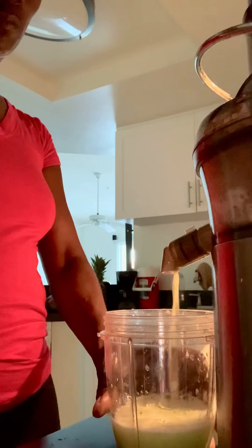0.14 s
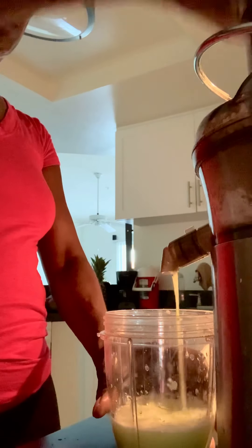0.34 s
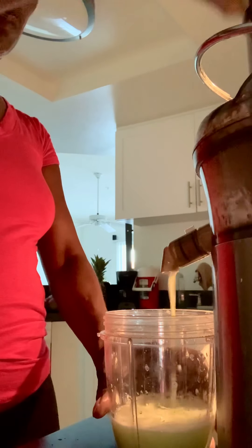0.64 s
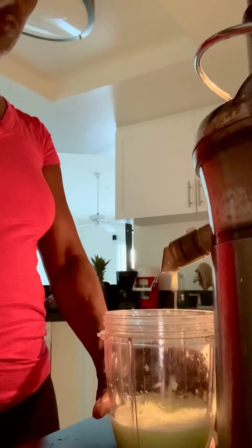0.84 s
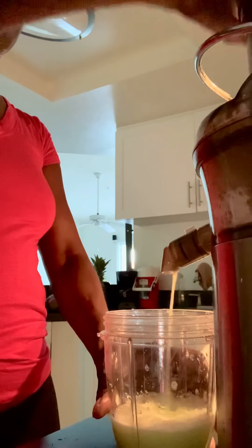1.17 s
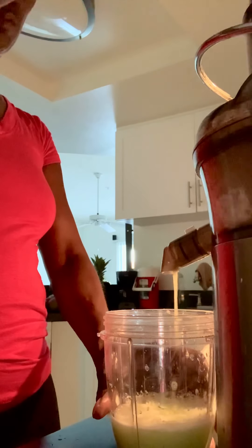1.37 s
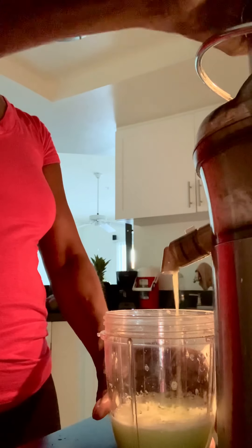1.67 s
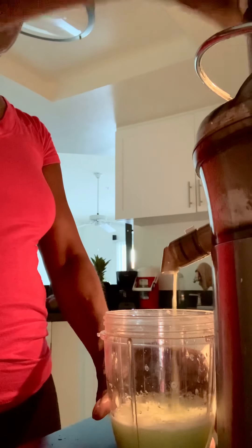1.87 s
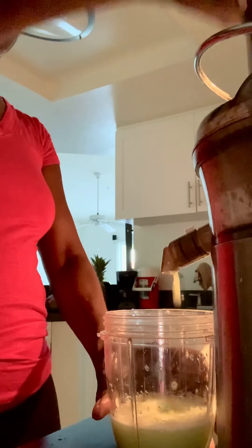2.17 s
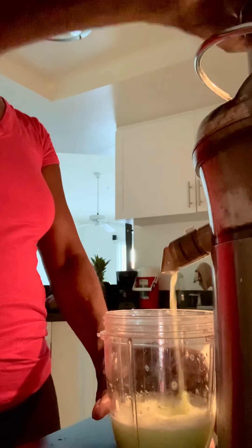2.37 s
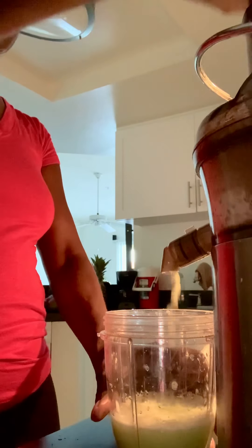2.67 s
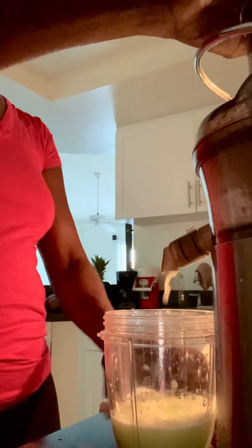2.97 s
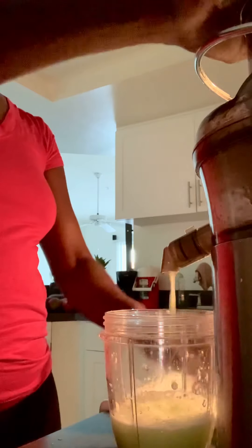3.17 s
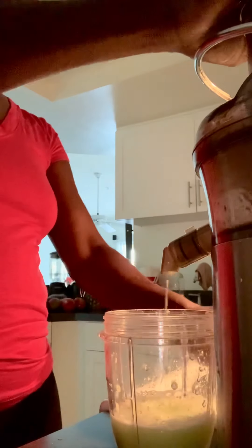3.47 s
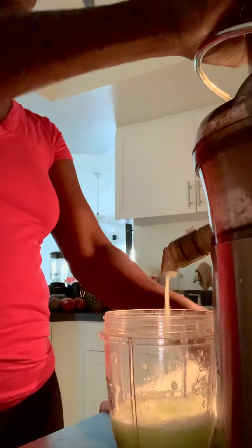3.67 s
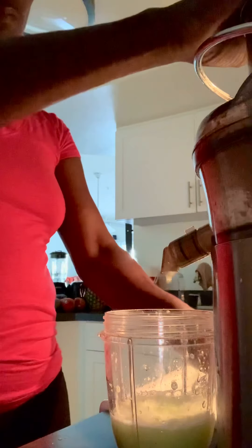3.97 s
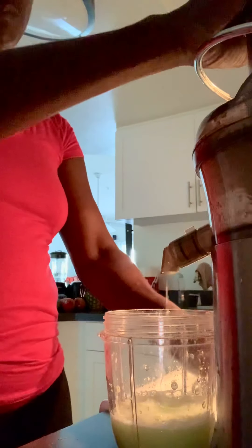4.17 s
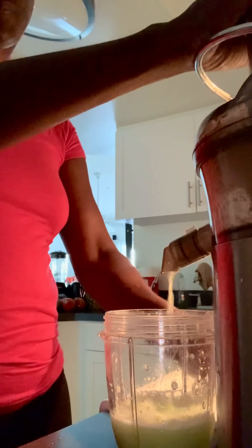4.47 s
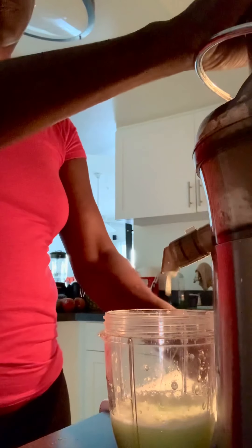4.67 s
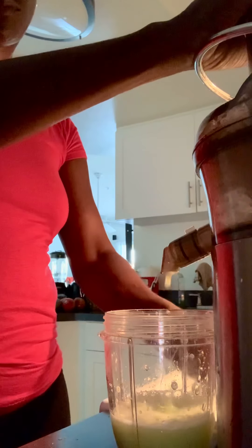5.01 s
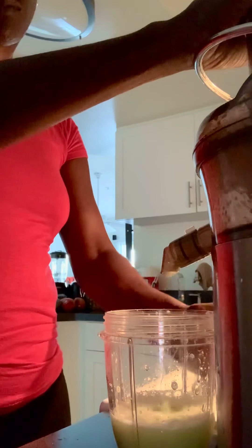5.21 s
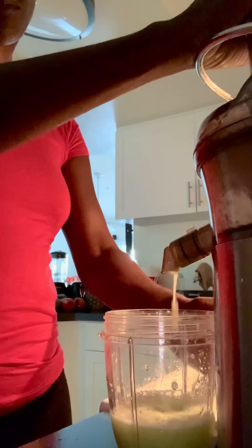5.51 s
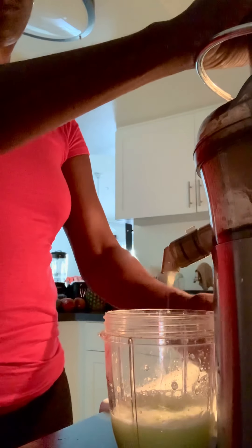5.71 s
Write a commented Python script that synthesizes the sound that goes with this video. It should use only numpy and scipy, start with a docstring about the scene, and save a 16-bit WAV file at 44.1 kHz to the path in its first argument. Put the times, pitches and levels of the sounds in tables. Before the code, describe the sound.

An electric juicer whirs steadily in a kitchen while its plastic pusher is rapped five times, then the motor starts winding down.

```python
"""On a kitchen counter, a centrifugal juicer runs at full speed close to two microphone ports.
Its unbalanced shaft drones, the commutator whines, the fan sings and magnetic pull hums, while air from
the spinning sieve rushes through the ringing housing. A hand raps the plastic food pusher five times
and a scrap of pulp sprays off the sieve. Near the end the motor is switched off and starts to coast."""
import sys
import numpy as np
from scipy import signal
from scipy.fft import rfft, irfft, next_fast_len
from scipy.io import wavfile
from scipy.ndimage import uniform_filter1d

SR = 44100
rng = np.random.default_rng(int(sys.argv[2]) if len(sys.argv) > 2 else 0)


def generate_wav(sig):
    """Save sig (samples, or channels by samples) to the path in sys.argv[1] as 16-bit PCM at SR."""
    pcm = np.round(np.clip(np.atleast_2d(sig).T, -1, 1) * 32767).astype(np.int16)
    wavfile.write(sys.argv[1], SR, pcm)


N = 257984
SWITCH_OFF_S = 5.36

# Shaft speed under power, creeping up as the pulp clears. Each row: time in seconds, speed in Hz.
SHAFT_SPEED = [(0, 186.2), (.3, 186.3), (.55, 186.75), (1.1, 186.85), (1.45, 186.7), (1.9, 187.2),
               (2.4, 187.5), (3.3, 188.25), (4.3, 188.55), (5.34, 188.95)]

def motor(spin_down_s=3.45):
    """The motor's tones ride on one shaft; at switch-off they slide down and the hum dies."""
    t = np.arange(N) / SR
    coasting_s = np.maximum(t - SHAFT_SPEED[-1][0], 0)
    speed = curve(SHAFT_SPEED, t) * np.exp(-coasting_s / spin_down_s)
    turn = 2 * np.pi * np.cumsum(speed) / SR
    current = np.exp(-np.maximum(t - SWITCH_OFF_S, 0) / .036)
    dip = press_dip(t)
    tones = dip * shaft_drone(turn, speed) + commutator_whine(t, turn) + cooling_fan(turn, speed)
    return np.sqrt(2) * (tones + current * dip * mains_hum(t, turn))


# Overtones of the drone. Each row: shaft multiple, level in dB against the fundamental.
SHAFT_ORDERS = [(3, -27.5), (4, -21), (6, -16), (7, -18), (10, -12.5), (12, -20), (14, -22)]

def shaft_drone(turn, speed, level_db=-28.5, sag_db_per_hz=.35):
    """Unbalance drones at the shaft rate and its multiples, weakening as the shaft slows."""
    drone = np.sin(turn) * gain_of(.7 * drift(N, size=1500))
    for order, db in SHAFT_ORDERS:
        wobble = .0052 * order * drift(N, size=600)  # the speed trembles, so high orders blur more
        level = gain_of(db + 2.36 * drift(N, size=2000))
        drone += level * np.sin(order * turn + wobble + 2 * np.pi * rng.random())
    return gain_of(level_db - sag_db_per_hz * np.maximum(SHAFT_SPEED[0][1] - speed, 0)) * drone


# The whine's swells and fades. Each row: time in seconds, level in dB.
WHINE_LEVEL = [(0, -48), (.55, -45), (1.3, -46), (1.65, -43), (2.0, -49), (2.2, -49), (2.42, -41),
               (3.3, -40), (3.85, -41), (4.3, -37), (5.34, -37.5), (5.38, -42), (5.44, -39), (5.47, -44),
               (5.6, -49), (5.67, -54), (5.71, -43), (5.77, -41), (5.8, -46), (5.85, -42)]

def commutator_whine(t, turn, bars=36):
    """A thin, high tone at the rate the commutator bars pass."""
    level = gain_of(curve(WHINE_LEVEL, t) + 1.4 * drift(N, size=600))
    return level * np.sin(bars * turn + .15 * drift(N, size=600))


# Fan and slot tones. Each row: shaft multiple, level in dB, lid resonance in Hz, width in Hz, lift in dB.
FAN_TONES = [(24, -60, 4520, 200, 8), (28, -62, 5270, 200, 6), (35, -64, 6600, 40, 10),
             (48, -62, 8580, 350, 19), (60, -64, 9950, 350, 15)]

def cooling_fan(turn, speed):
    """High fan tones, each lifted when its pitch lies near a lid resonance."""
    tones = np.zeros(N)
    for order, db, lid_hz, width_hz, lift_db in FAN_TONES:
        lift = lift_db / (1 + (2 * (order * speed - lid_hz) / width_hz) ** 2)
        level = gain_of(db + lift + 1.5 * drift(N, size=3000))
        tones += level * np.sin(order * turn + .4 * drift(N, size=600))
    return tones


# Partials of the hum. Each row: shaft multiple, mains multiple, level in dB.
HUM_PARTIALS = ((0, 1, -34.5), (0, 2, -45.5), (0, 3, -46), (0, 4, -47), (0, 5, -54), (0, 7, -56),
                (1, -2, -44), (1, -1, -55), (1, 1, -45), (1, 2, -53), (2, -2, -55), (2, -1, -54),
                (2, 0, -42.5), (2, 1, -52), (2, 2, -53), (3, -2, -52), (3, 1, -48), (3, 2, -54.5),
                (4, -2, -54), (8, 1, -48))

def mains_hum(t, turn, mains_hz=60):
    """Magnetic pull mixes the mains with the rotation into sum and difference tones."""
    mains = 2 * np.pi * mains_hz * t
    return sum(gain_of(db + .7 * drift(N, size=1500))
               * np.sin(order * turn + harmonic * mains + 2 * np.pi * rng.random())
               for order, harmonic, db in HUM_PARTIALS)


# The broad bed of air and sieve noise. Each row: frequency in Hz, spectral level in dB.
AIR_BED = [(30, -73), (100, -66), (150, -64.5), (220, -68.5), (350, -70), (600, -66), (1070, -76),
           (1400, -66.5), (2050, -66.5), (2550, -73), (3100, -76.5), (3550, -78.5), (4200, -76.5),
           (4400, -74.5), (5000, -74.5), (6300, -75), (7500, -76), (11000, -78), (12300, -87.5),
           (15700, -104)]
# Housing, bowl and lid resonances. Each row: centre in Hz, width in Hz, spectral level in dB.
HOUSING_PEAKS = [(243, 36, -58), (312, 40, -65), (456, 38, -57.5), (690, 30, -63.5), (780, 48, -57.5),
                 (953.6, 102, -56.5), (1137.5, 31.5, -51), (1225, 44, -56.5), (1298, 55, -56.5),
                 (1531, 68, -57.5), (1596, 23, -60), (1678, 70, -60), (1960, 60, -64), (2110, 50, -65),
                 (2210, 70, -66), (2310, 70, -65), (2420, 70, -65), (2640, 60, -70), (2750, 60, -71),
                 (2860, 50, -70), (2930, 45, -69), (3720, 100, -76), (4000, 180, -73), (4520, 200, -75),
                 (5220, 150, -70), (5850, 400, -72), (6600, 200, -75), (7040, 300, -76.5), (8630, 65, -75),
                 (14800, 1700, -80)]
# The chute's ring, louder with the pusher home. Each row: time in seconds, spectral level in dB.
CHUTE_LEVEL = [(0, -49.5), (2.6, -49.5), (3.1, -45), (3.6, -45.5), (3.9, -45), (4.3, -49), (4.75, -44.5),
               (5, -47), (5.34, -45), (5.45, -48.5), (5.85, -50)]
# The buzz of the current leaves the bass at switch-off. Each row: frequency in Hz, gain in dB.
COASTING_EQ = [(60, -6), (130, -3), (270, -3.5), (450, -.5), (800, 0)]
# The seated pusher damps the lower housing. Each row: frequency in Hz, gain in dB.
PRESSED_EQ = [(200, -2), (250, -1.6), (350, -0.92), (480, -2), (650, -2.3), (1000, 0.094)]
# Stereo image of the air. Each row: frequency in Hz, left-right likeness (1 is mono).
AIR_LIKENESS = [(60, .99), (250, .92), (500, .88), (750, .78), (1400, .7), (2000, .66), (4000, .88),
                (15000, .84)]

def sieve_air(air_db=1, coast_db=-1, pressed_s=2.75, chute_hz=1844, chute_width_hz=65):
    """Turbulent air from the spinning sieve; each lower resonance surges and fades by itself."""
    frames, hz = N // 512 + 5, np.fft.rfftfreq(2048, 1 / SR)[:, None]
    t = np.arange(frames) * 512 / SR

    def peak(centre_hz, width_hz, db):
        return gain_of(2 * db) / (1 + (2 * (hz - centre_hz) / width_hz) ** 4)

    surges = drift((len(HOUSING_PEAKS) + 1, frames), size=2)
    housing = sum(peak(centre, width, db + .56 * surge * (centre < 2500))
                  for (centre, width, db), surge in zip(HOUSING_PEAKS, surges))
    coasting_db = (coast_db + spectrum(COASTING_EQ, hz)) * (t > SWITCH_OFF_S)
    pressed_db = spectrum(PRESSED_EQ, hz) * (t > pressed_s)
    power = gain_of(2 * spectrum(AIR_BED, hz)) + housing
    power = power * gain_of(2 * (air_db + coasting_db + pressed_db))
    power += peak(chute_hz, chute_width_hz, curve(CHUTE_LEVEL, t) + 1.2 * surges[-1])
    noise = rng.standard_normal((frames, 1025, 5)).T
    right, apart = noise[0] + 1j * noise[1], noise[2] + 1j * noise[3]
    likeness = spectrum(AIR_LIKENESS, hz)
    left = likeness * right + np.sqrt(1 - likeness ** 2) * apart
    flicker = evened(uniform_filter1d(uniform_filter1d(noise[4], size=16, axis=0), size=4, axis=1))
    level = np.sqrt(power) * gain_of(1.1 * flicker + .3 * drift(frames, size=2))
    _, rush = signal.istft(np.array([left, right]) * level, nperseg=2048, noverlap=1536)
    return np.sqrt(np.mean(level ** 2) * SR / 2) * evened(rush[:, :N])


# Raps on the pusher. Each row: start in seconds, blow in dB, then rattle, tick, low clonk and
# high clonk in dB against the blow.
PUSHER_RAPS = [(0.2694, -7.5, -8.5, -11, -15, -8), (0.876, -8.5, -5.5, -9, -15, 0),
               (1.524, -9.5, -4.5, -11, -7, -2.5), (2.1334, -8, -5.5, -10.5, -4, 2.5),
               (2.6861, -8.5, -13, -14.5, -4.5, -5)]
SEAT_S = .01058  # the pusher seats this long after first contact

def pusher_raps():
    """Each blow is a bright tick and a plastic rattle over a thump of the housing."""
    t = np.arange(8000) / SR
    tick_shape = np.minimum(t / .00026, 1) * (np.exp(-t / .011) + .36 * np.exp(-t / .001))
    raps = np.zeros(N)
    for start_s, blow_db, rattle_db, tick_db, *clonk_db in PUSHER_RAPS:
        rattle = gain_of(rattle_db) * pusher_rattle(t)
        tick = gain_of(tick_db) * tick_shape * evened(band(rng.standard_normal(len(t)), 1900, 9400))
        thump = band(housing_bend(t) + body_ring(t, clonk_db), 54, 5400)
        at = round(start_s * SR)
        raps[at:at + len(t)] += gain_of(blow_db) * (thump + rattle + tick)
    return raps


def press_dip(t, depth_db=-10, fall_s=.035, recover_s=.025):
    """A gain that ducks for a moment as each blow presses the housing down."""
    since = np.maximum(t - np.array(PUSHER_RAPS)[:, :1], 0)
    presses = np.minimum(since / fall_s, 1) * np.exp(-np.maximum(since - fall_s, 0) / recover_s)
    return gain_of(depth_db * presses.sum(axis=0))


# The pusher's plastic modes. Each row: pitch in Hz, relative level in dB, t60 in seconds.
PUSHER_MODES = [(1210, -2, 0.012), (1640, 12.5, 0.0075), (2005, 19, 0.0099), (2243, 14.5, 0.012),
                (2640, 7, 0.042), (3950, 10, 0.0028)]

def pusher_rattle(t, contact=2.2, hits_per_s=4000):
    """The pusher chatters in its chute, dropping away once it seats."""
    loose = np.minimum(t / .0007, 1) * np.exp(-t / .02 - np.maximum(t - SEAT_S, 0) / .002)
    force = (loose + .25 * np.exp(-t / .03)) * rng.standard_normal(len(t))
    chatter = force * (rng.random(len(t)) < hits_per_s / SR)
    chatter[[2, 37]] += contact, -contact  # its two edges land
    modes = sum(gain_of(db - 60 * t / t60) * np.sin(2 * np.pi * hz * t) for hz, db, t60 in PUSHER_MODES)
    rattle = signal.fftconvolve(chatter, modes)[:len(t)]
    return rattle / np.sqrt(np.mean(rattle[:500] ** 2))


def housing_bend(t, top_hz=849, end_hz=228, slide_s=.004835):
    """The blow bends the housing, its pitch diving as the pusher is driven home."""
    hz = end_hz + (top_hz - end_hz) * np.exp(-(t / slide_s) ** 3)
    shape = np.minimum(t / .00026, 1) ** 2 * np.exp(-np.maximum(t - SEAT_S, 0) / .0026)
    scoop = gain_of(-4 / (1 + ((hz - 430) / 120) ** 2))  # weaker in mid-slide
    return -np.sin(2 * np.pi * np.cumsum(hz) / SR) * shape * scoop


# Housing and counter modes. Each row: pitch in Hz, level in dB against the blow, t60 in seconds.
BODY_MODES = [(95, -20, 0.15), (105.3, -7.5, 0.11), (161.6, -11, 0.16), (253.6, -13.5, 0.22),
              (300, -23.5, 0.11), (646, -8.5, 0.054), (783, -7, 0.048)]
# The chute's hollow clonks. Each row: pitch in Hz, t60 in seconds, entry in seconds after contact.
CHUTE_CLONKS = [(481.7, 0.071, 0.0075), (947, 0.057, 0.00306)]

def body_ring(t, clonk_db):
    """Housing, counter and chute ring on, tuned a little differently at every blow."""
    modes = [(*row, SEAT_S - .003) for row in BODY_MODES]
    modes += [(hz, db, t60, entry_s) for (hz, t60, entry_s), db in zip(CHUTE_CLONKS, clonk_db)]
    ring = np.zeros(len(t))
    for hz, db, t60, entry_s in modes:
        age = np.maximum(t - entry_s, 0)
        shape = gain_of(db - 60 * age / t60) * np.minimum(age / .0043, 1)
        detune = .98 + .053 * rng.random()
        ring += shape * np.sin(2 * np.pi * hz * detune * age)
    return ring


def pulp_spray(start_s=1.12, end_s=1.25, spray_db=-34.5, fleck_s=1.208, fleck_db=-19):
    """Fine droplets fizz off the sieve and one fleck ticks against the lid."""
    t = np.arange(N) / SR
    swell = np.sin(np.pi * np.clip((t - start_s) / (end_s - start_s), 0, 1)) ** 2
    drops = rng.standard_normal(N) * gain_of(6.5 * drift(N, size=30))
    since = np.maximum(t - fleck_s, 0)
    fleck = (since > 0) * np.exp(-since / .003) * evened(band(rng.standard_normal(N), 1900, 3800))
    return gain_of(spray_db) * swell * evened(band(drops, 5600, 12000)) + gain_of(fleck_db) * fleck


def kitchen(x, t60=.24):
    """Sparse reflections off cupboards and tiles, a separate set for each side."""
    taps = np.zeros((2, SR // 2))
    at = np.arange(200, SR // 2 - 20, 20) + rng.integers(0, 20, (2, (SR // 2 - 201) // 20))
    np.put_along_axis(taps, at, rng.choice([-1., 1.], at.shape), 1)
    taps *= gain_of(-60 * np.arange(SR // 2) / SR / t60)
    return signal.fftconvolve(x[None], taps / np.linalg.norm(taps[0]), axes=1)[:, :N]


def gain_of(db):
    """Decibels to amplitude."""
    return 10 ** (np.asarray(db) / 20)


def evened(x):
    """Scales to rms 1."""
    return x / np.sqrt(np.mean(x ** 2) + 1e-20)


def curve(points, t):
    """Joins breakpoints over time."""
    return np.interp(t, *np.transpose(points))


def spectrum(points, hz):
    """Joins breakpoints over log frequency."""
    f, value = np.transpose(points)
    return np.interp(np.log(hz + 1), np.log(f + 1), value)


def drift(shape, size):
    """Slow random wander along the last axis, rms 1."""
    return evened(uniform_filter1d(uniform_filter1d(rng.standard_normal(shape), size), size))


def band(x, lo_hz, hi_hz):
    """Band-pass."""
    return signal.sosfilt(signal.butter(2, [lo_hz, hi_hz], "bandpass", fs=SR, output="sos"), x)


def scene():
    """The running juicer and the raps, with a touch of room on the raps alone."""
    raps = pusher_raps()
    return motor() + sieve_air() + pulp_spray() + raps + gain_of(-8.5) * kitchen(band(raps, 370, 5200))


# Shading of the left port. Each row: frequency in Hz, left minus right in dB.
LEFT_SHADE = [(60, 0), (92, -.5), (140, -2.5), (200, -2.5), (245, -4), (330, .5), (500, -.5), (770, -3),
              (1050, -1.5), (1400, -2.5), (1900, 0), (15000, 0)]
# Extra lag round the shading body. Each row: frequency in Hz, lag in radians.
LEFT_PHASE = [(300, 0.12), (520, 0.31), (780, 0.77), (1200, 0.32), (1800, 0)]

def record(dry, left_lag_s=5 / SR, top_hz=15800):
    """Two ports: the juicer stands towards the right, so the left hears it later and partly shaded."""
    size = next_fast_len(N + 2048)
    hz = np.fft.rfftfreq(size, 1 / SR)
    shade = gain_of(spectrum(LEFT_SHADE, hz) / 2)
    lag = 2 * np.pi * hz * left_lag_s + spectrum(LEFT_PHASE, hz)
    ports = np.array([shade * np.exp(-1j * lag), 1 / shade])
    ports *= 1j * hz / (40 + 1j * hz)  # the capsules lose the deepest bass
    pair = irfft(rfft(dry, size) * ports, size)[:, :N]
    overload = np.sign(pair) * (.6 + .35 * np.tanh((abs(pair) - .6) / .35))
    pair = np.where(abs(pair) > .6, overload, pair)
    lowpass = signal.firwin(511, top_hz, window=("kaiser", 9), fs=SR)
    return signal.oaconvolve(pair, lowpass[None], "same")


dry = scene()
out = record(dry)
generate_wav(out)
```